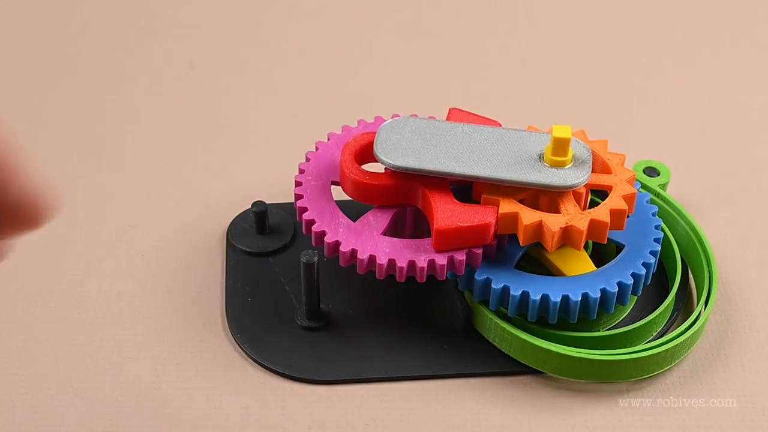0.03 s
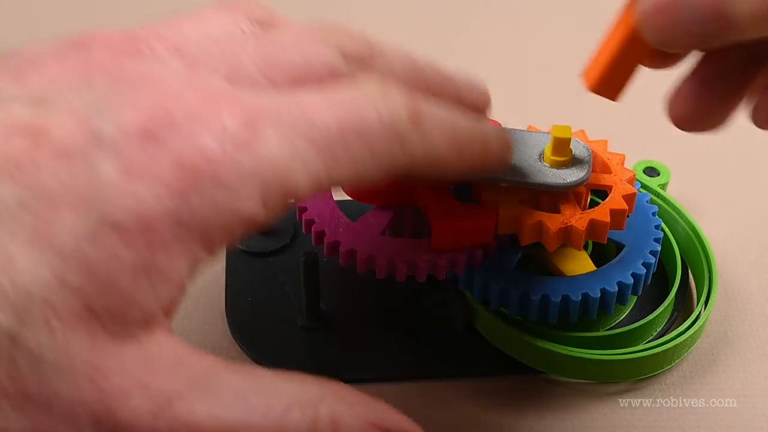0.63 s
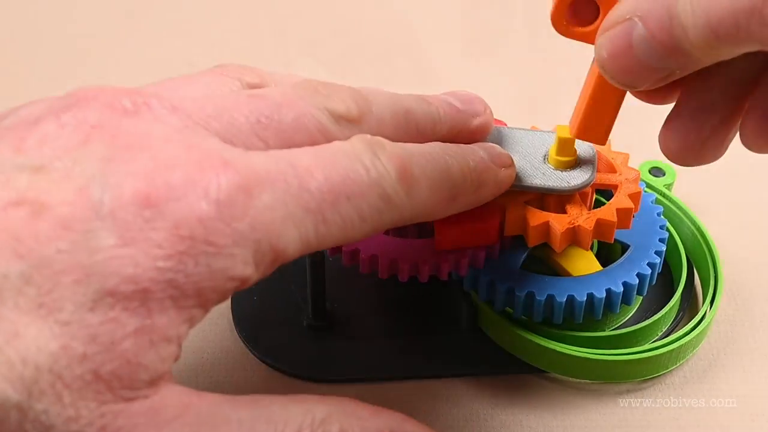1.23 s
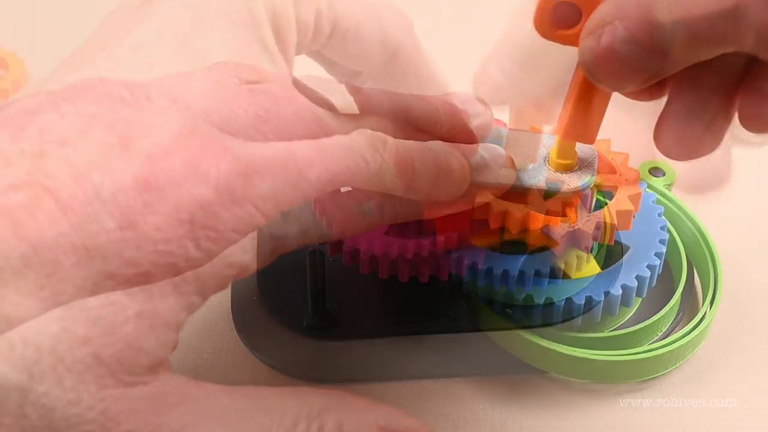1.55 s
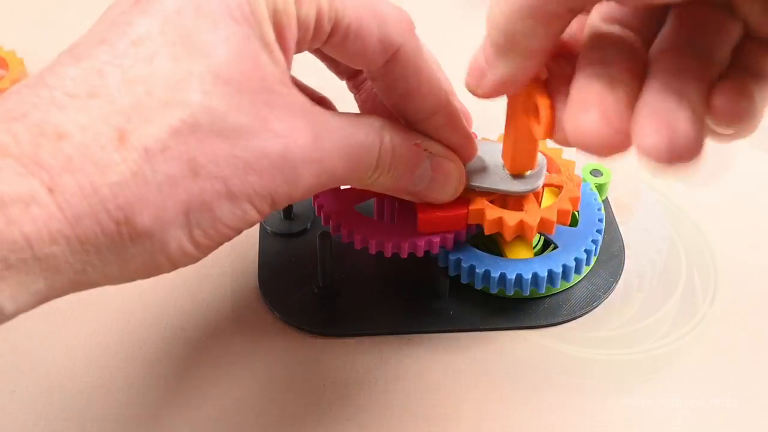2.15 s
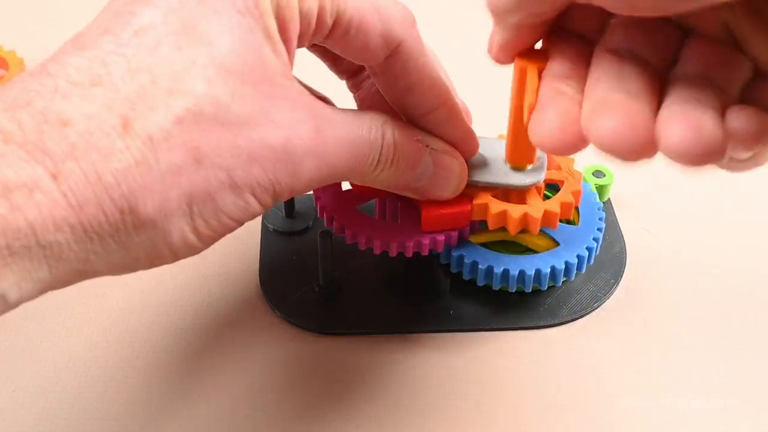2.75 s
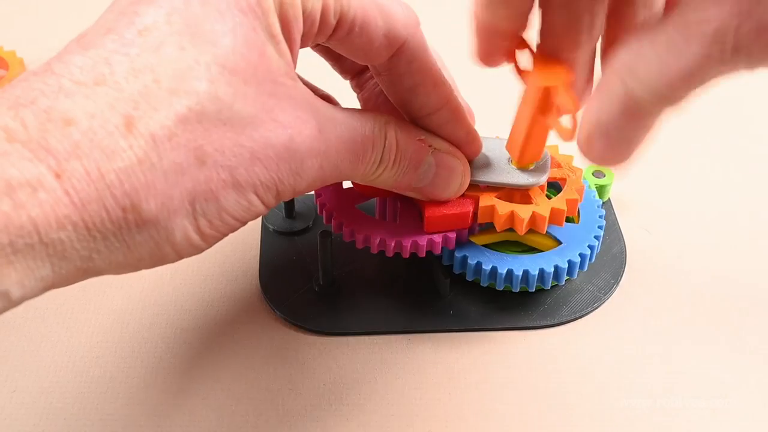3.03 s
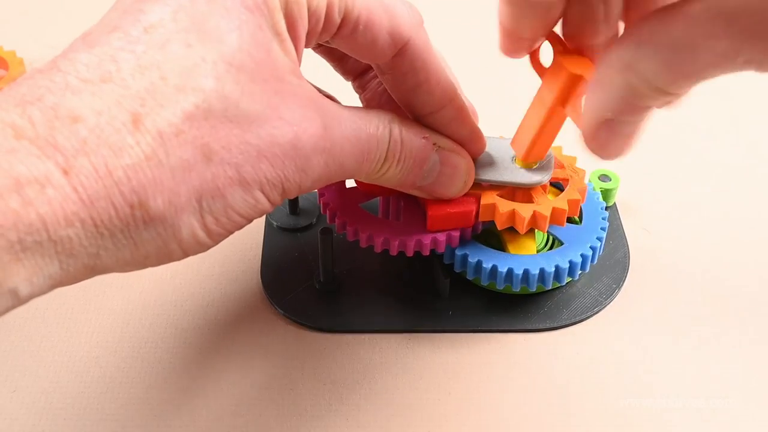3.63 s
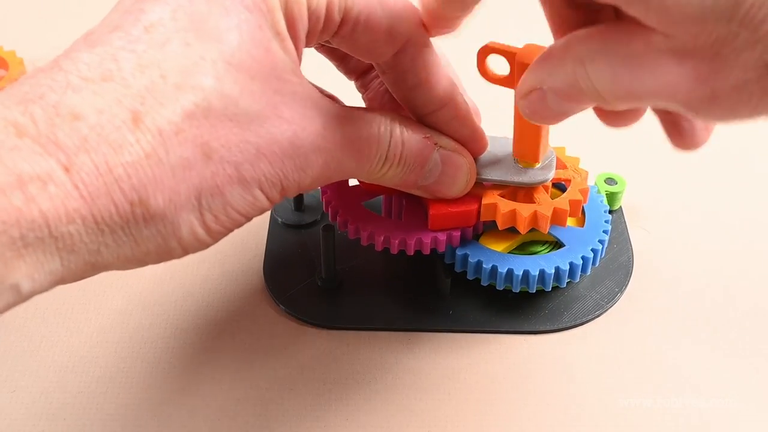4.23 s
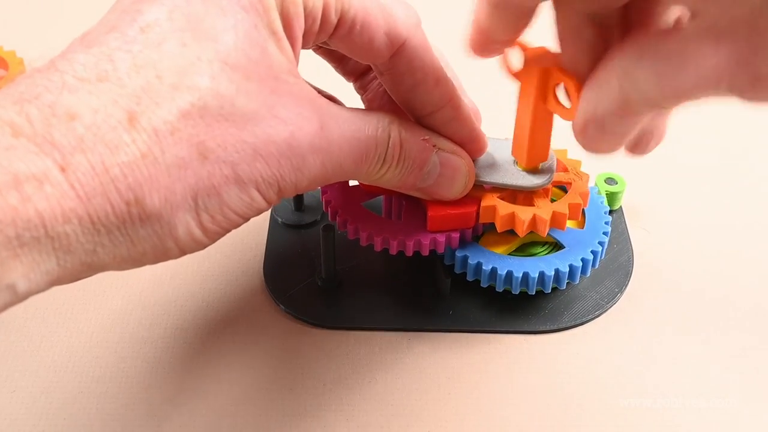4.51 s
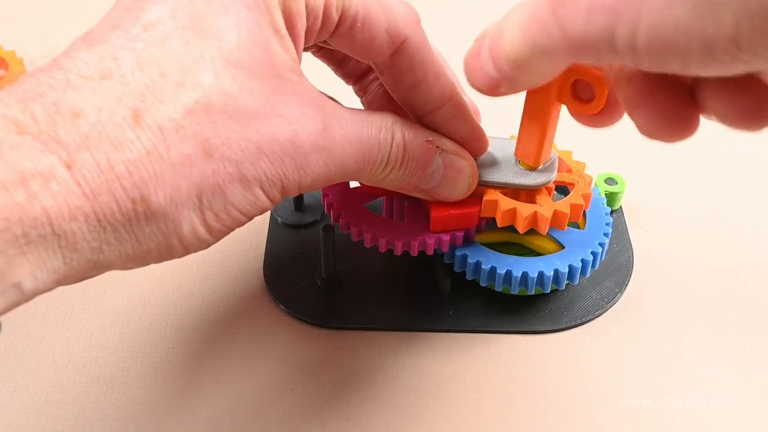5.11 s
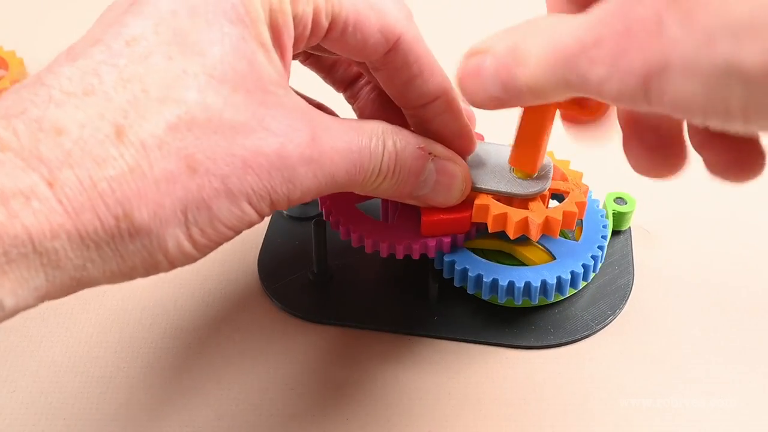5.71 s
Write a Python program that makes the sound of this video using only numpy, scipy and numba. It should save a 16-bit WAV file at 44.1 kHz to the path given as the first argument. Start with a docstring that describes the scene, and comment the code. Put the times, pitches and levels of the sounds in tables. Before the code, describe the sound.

A small plastic clockwork mechanism is handled on a table, close to a stereo microphone in a small room. It opens with a brief key squeak, then fingers rub and knock on the plastic, with soft table bumps and a high hiss that swells between 1.2 and 2.2 seconds. The key winds the spring in short twists at about 1.4, 2.0, 2.6, 3.2 and 3.7 seconds. In each, the gear creaks and breaks free, mostly with a sharp snap, and a springy catch rattles brightly over the teeth for under a fifth of a second. The level dips briefly after each snap and rattle. Light knocks, stray ticks and faint squeaks fall in between. A slower sixth twist snaps at 4.7 seconds and trails into separate ticks until 5.2. More knocks and rubbing follow, with a small squeak and puff of hiss near 5.9 seconds.

```python
"""A key squeaks and fingers rub and knock on a plastic clockwork model, held down on a table
close to a stereo microphone in a small room. The key winds it in six twists. In each, the gear creaks
and breaks free, mostly with a snap, and a pawl (a small springy catch) rattles over the teeth until
the wrist brakes. The last twist is slow and ends in lone ticks. High hiss comes and goes.
An automatic gain control turns the sound down briefly behind each snap and rattle."""
import sys
import numpy as np
from scipy import signal
from scipy.fft import rfft, irfft
from scipy.io import wavfile
from scipy.ndimage import uniform_filter1d
from numba import njit

SR = 44100
rng = np.random.default_rng(int(sys.argv[2]) if len(sys.argv) > 2 else 0)


def output_pcm(signal):
    """Save a mono or channel-first signal as 16-bit PCM at the path in sys.argv[1].

    Samples are clipped to [-1, 1] before scaling.
    """
    pcm = np.clip(np.atleast_2d(signal).T, -1, 1) * 32767
    wavfile.write(sys.argv[1], SR, np.round(pcm).astype(np.int16))


N = 263277


def undb(db):
    """Turn decibels into a volume factor."""
    return 10 ** (np.asarray(db) / 20)


def unit(x):
    """Scale x to an average (rms) level of 1."""
    return x / np.sqrt(np.mean(x ** 2) + 1e-20)


def strength(x, db, seconds):
    """Give a hit the energy of a steady level db that lasts this many seconds."""
    return x * undb(db) * np.sqrt(seconds * SR / np.mean(np.sum(x ** 2, axis=-1)))


def add(out, start_s, x):
    """Mix x into out at the given time."""
    i = max(int(start_s * SR), 0)
    out[:, i:i + x.shape[1]] += x[:, :max(N - i, 0)]


def along(table, hz, column=1):
    """Read a table's column at any pitch, gliding between its rows."""
    rows = np.array(table)
    return np.interp(np.log(hz + 1), np.log(rows[:, 0]), rows[:, column])


def band(x, low_hz, high_hz):
    """Keep what lies between two pitches."""
    edges_hz = [low_hz, min(high_hz, SR / 2 - 500)]
    return signal.sosfilt(signal.butter(3, edges_hz, "band", fs=SR, output="sos"), x)


def aligned_band(x, low_hz, high_hz):
    """Keep one band without delaying it, so that neighbouring bands join smoothly."""
    hz = np.fft.rfftfreq(x.shape[-1], 1 / SR) + 1
    return irfft(rfft(x) / (1 + (low_hz / hz) ** 10) / (1 + (hz / high_hz) ** 10))


def soften(x, hz):
    """A soft contact dulls what lies above hz."""
    return signal.sosfilt(signal.butter(2, min(hz, SR / 4), fs=SR, output="sos"), x)


def flatten(x, fade_s):
    """Make all pitches in a burst equally strong, then fade it quickly."""
    spectrum = rfft(x)
    return irfft(spectrum / (np.abs(spectrum) + 1e-9)) * np.exp(-np.arange(x.shape[-1]) / SR / fade_s)


def ring(x, tones, detune=1):
    """Let x shake an object's own tones (pitch_hz, width_hz, level_db); narrow ones ring longer."""
    f = np.fft.rfftfreq(x.shape[-1], 1 / SR) + 1e-6
    response = sum(undb(db) / (1 + 1j * (f - (hz * detune) ** 2 / f) / width) for hz, width, db in tones)
    return irfft(rfft(x) * response, x.shape[-1])


def stereo_noise(size, spread):
    """Hiss for left and right; spread sets how much the two differ."""
    mid, side = rng.standard_normal((2, size))
    return np.array([mid + spread * side, mid - spread * side])


def chatter(size, hold_s, fade_s, spread):
    """Plastic parts chatter while they touch, then settle."""
    t = np.arange(size) / SR
    fade = np.exp(-np.maximum(t - hold_s, 0) / fade_s)
    return stereo_noise(size, spread) * fade * (1 - np.exp(-t / .0001))


def blow(size, impact_db, fade_s, spread):
    """One clean impact, then chatter as the parts settle."""
    settling = strength(chatter(size, 0, fade_s, spread), 0, 1 / SR)
    return settling + undb(impact_db) * signal.unit_impulse(size)


def friction(per_s, scatter_db, spread):
    """Tiny random clicks of uneven size, as when surfaces stick and slip."""
    slips = rng.random(N) < per_s / SR
    return stereo_noise(N, spread) * slips * undb(scatter_db * np.minimum(rng.exponential(size=N), 4))


def swells(rows, rest_db=-120, rise_s=.004, fade_s=.009):
    """Volume over time: each row starts, changes by swell_db around its level_db, and fades."""
    power = np.full(N, undb(rest_db) ** 2)
    for start_s, length_s, level_db, swell_db in rows:
        i = max(int(start_s * SR), 0)
        t = np.arange(min(int((length_s + .2) * SR), N - i)) / SR
        gain = undb(level_db + swell_db * (np.minimum(t / length_s, 1) - .5))
        fade = np.exp(-np.maximum(t - length_s, 0) / fade_s)
        power[i:i + len(t)] += (gain * np.minimum(t / rise_s, 1) * fade) ** 2
    return np.sqrt(power)


# The turning key drags on its shaft: start_s, length_s, pitch_hz, width_hz, level_db
KEY_SQUEAKS = [(0, 0.022, 1564, 48.4, -33), (0.038, 0.022, 3800, 121, -44), (0.837, 0.21, 1930, 1200, -56),
               (2.888, 0.25, 1710, 700, -54.5), (4.371, 0.28, 1680, 810, -54),
               (4.502, 0.15, 11500, 200, -65), (5.884, 0.13, 1656, 106, -45)]
def squeaks():
    """Friction locks onto one tone of the key; the narrower the tone, the more it squeaks."""
    out = np.zeros((2, N))
    for start_s, length_s, hz, width_hz, db in KEY_SQUEAKS:
        size = int(length_s * SR)
        tone = ring(stereo_noise(size, spread=.054), [(hz, width_hz, 0)])
        drag = unit(band(tone, hz / 2, hz * 1.01))
        add(out, start_s, drag * signal.windows.tukey(size) * undb(db))
    return out


# The tones of the frame and wheels, lowest first: pitch_hz, width_hz, level_db
FRAME_TONES = [(260, 35, 6), (302, 37, -3), (382, 300, -3.5), (474, 84, -9), (559.5, 18, 0.5), (795, 48, 1),
               (835, 62, 0), (1039, 48, 2.5), (1153, 93, -2.5), (1340, 78, -18), (1644, 54, 0.5),
               (1843, 36, -10), (2030, 98, -14), (2383, 400, -7.5), (2680, 200, -9), (3270, 600, -3.5)]
# The tones of the table top: pitch_hz, width_hz, level_db
TABLE_TONES = [(137.6, 14.2, 18), (210, 69, 5.5)]
def thump(push, time_s, regrip_s=2):
    """Frame and table boom; the table booms less once the flat hand changes to a fingertip grip."""
    table_db = np.where(time_s < regrip_s, 0, -2.5)
    return ring(push, FRAME_TONES[:3]) + undb(table_db) * ring(push, TABLE_TONES)


# Fingers slide to a new grip: start_s, length_s, rub_db, push_db, swell_db
FINGER_SLIDES = [(0, 0.22, -55, -47, -5), (0.23, 0.25, -60.5, -59, -11), (0.583, 0.18, -55, -48, -8),
                 (0.746, 0.26, -51, -53.5, -2), (1.11, 0.33, -47, -50, 1), (1.67, 0.26, -49, -52.5, 2),
                 (2.264, 0.074, -52, -54, 4), (2.432, 0.97, -58.5, -62, 1), (2.862, 0.18, -58.5, -62, -9),
                 (3.009, 0.25, -52.5, -62, -15), (3.389, 0.088, -55.5, -62.5, -20),
                 (3.554, 0.18, -54.5, -55, -12), (4.01, 0.11, -47, -61, 0), (4.231, 0.39, -53, -49, -1.5),
                 (5.361, 0.043, -44.5, -44, -1), (5.68, 0.13, -58, -63.5, -19), (5.85, 0.2, -48, -50.5, 7)]
def rubbing():
    """Skin and wheels rub on the frame and push it against the table; fingers catch now and then."""
    rubs = [(start, length, db, swell) for start, length, db, _, swell in FINGER_SLIDES]
    pushes = [(start, length, db, swell) for start, length, _, db, swell in FINGER_SLIDES]
    finger_rub = swells(rubs, rest_db=-63.5)  # a resting hand is never quite still
    finger_push = swells(pushes, rest_db=-59)
    skin = friction(per_s=3000, scatter_db=1.5, spread=.21)
    rub = unit(band(ring(skin, FRAME_TONES[3:]) + undb(4) * skin, 380, 2800))
    slips = friction(per_s=30, scatter_db=1, spread=.3)
    jolt = chatter(size=1024, hold_s=0, fade_s=.0025, spread=.3)
    jolts = signal.fftconvolve(slips, jolt, axes=1)[:, :N]
    catches = undb(-7) * unit(band(ring(jolts, FRAME_TONES[3:]), 380, 2600))
    pressure = friction(per_s=3100, scatter_db=3, spread=.25)
    boom = unit(band(thump(pressure, np.arange(N) / SR), 112, 520))
    rub_volume = np.hypot(finger_rub, wheel_volume(db=-48))
    boom_volume = np.hypot(finger_push, wheel_volume(db=-52.5))
    return rub * rub_volume + catches * finger_rub + boom * boom_volume


# The bright tones of the hiss and of hard knocks on the frame: pitch_hz, width_hz, level_db
BRIGHT_TONES = [(3630, 4500, 8), (5700, 4200, 15.5), (8800, 2700, -22.5), (13300, 2500, -1.5)]
# Stretches of high hiss; the second is a sudden puff that fades quickly:
# start_s, length_s, level_db, swell_db
HISS_SWELLS = [(0, 0.19, -51, -3), (1.025, 0.12, -56.5, -31), (1.17, 1, -43, 12), (1.6, 0.58, -61.5, -5),
               (5.88, 0.078, -61.5, 39)]
def high_hiss(flicker_s=.007, flicker_db=3):
    """Dense tiny clicks blur into a bright hiss that flickers as it swells or fades."""
    hiss = unit(ring(friction(per_s=8800, scatter_db=-3.5, spread=1), BRIGHT_TONES))
    wobble = unit(uniform_filter1d(rng.standard_normal(N), int(flicker_s * SR)))
    flicker = unit(undb(flicker_db * wobble))
    return hiss * flicker * swells(HISS_SWELLS)


# The hand shifts its weight: start_s, length_s, level_db, swell_db
HAND_SHIFTS = [(0, 0.62, -64.5, -14), (1.25, 0.17, -47.5, 11), (1.67, 0.29, -41, 6), (2.33, 0.17, -57, 3)]
def rumble():
    """The hand's weight makes the table rumble, more quietly on the left."""
    low_noise = unit(band(stereo_noise(N, spread=.9), 28, 90)) * undb([[-7], [0]])
    return low_noise * swells(HAND_SHIFTS, rest_db=-80)


# The tone colour of the room's air: pitch_hz, relative_db
AIR_COLOUR = [(25, -12), (90, -12), (134, -8.5), (190, -27.5), (800, -9), (2500, -24.5), (6000, -20),
              (16000, -28)]
def air(level_db=-58.5):
    """The faint steady noise of the room."""
    colour = undb(along(AIR_COLOUR, np.fft.rfftfreq(N, 1 / SR)))
    return unit(irfft(rfft(stereo_noise(N, spread=.57)) * colour, N)) * undb(level_db)


# Key and fingers hit the frame: start_s, low_db, mid_db, high_db, pitch_hz, dull_above_hz
FRAME_KNOCKS = [(.0042, -48, -42, -42, 1700, 2460), (0.0912, -40, -36.5, -44.5, 1100, 2160),
                (0.2428, -44.5, -44.5, -51, 880, 1460), (0.2792, -51, -48.5, -64, 1150, 1100),
                (0.3384, -48.5, -49.5, -67, 1210, 1100), (0.4456, -74, -54.5, -76, 940, 3000),
                (.563, -54, -49.5, -57.5, 2100, 3020), (.596, -42, -39, -38.5, 1690, 2890),
                (0.7238, -40, -40, -52.5, 1180, 1580), (.758, -45.5, -37.5, -52.5, 680, 2410),
                (.769, -57, -51, -60, 1640, 3200), (0.991, -55, -53.5, -62, 1600, 3000),
                (1.1291, -48, -68, -52, 1600, 2800), (1.1659, -76.5, -43.5, -36.5, 2350, 3300),
                (1.2654, -50, -43.5, -49, 2370, 3000), (1.3132, -68.5, -50, -50, 2300, 3000),
                (1.3357, -67.5, -45.5, -48, 2270, 3000), (1.4001, -54, -44, -51, 2380, 3220),
                (1.6917, -73.5, -37.5, -39, 2270, 3180), (1.8271, -62.5, -43, -52, 1240, 2800),
                (1.8494, -51, -36, -50, 1340, 3380), (1.962, -46.5, -43, -47, 1040, 1400),
                (2.287, -80, -40.5, -47, 3030, 3260), (2.4277, -64, -52, -55, 1630, 3000),
                (2.444, -50.5, -43, -44, 1300, 2410), (2.559, -47, -45.5, -47, 2580, 3200),
                (2.893, -55, -49, -51.5, 1630, 2620), (3.0317, -58, -38.5, -45.5, 1050, 2820),
                (3.0607, -67, -42.5, -59, 1030, 2000), (3.073, -68.5, -62, -39, 1220, 3000),
                (3.1091, -48, -44, -58.5, 1630, 2200), (3.1418, -55, -44.5, -45, 1220, 2600),
                (3.5837, -48, -44, -39.5, 2650, 3950), (3.6144, -49, -46, -56, 1080, 1980),
                (3.6631, -48, -45, -34, 2550, 2980), (3.682, -51, -48.5, -60, 554, 1810),
                (3.7148, -48, -49, -30, 2710, 3500), (4.0762, -46, -47, -45.5, 1150, 2970),
                (4.3533, -67, -45, -43, 1500, 2380), (4.386, -75, -45, -31, 1650, 3140),
                (5.3663, -48.5, -44, -52, 570, 1500), (5.3853, -46.5, -44, -60, 1030, 1290),
                (5.554, -45, -31, -40, 1970, 3830), (5.6828, -74, -50, -46, 2370, 3000),
                (5.806, -53, -58, -47, 2300, 3000), (5.8242, -47.5, -43.5, -31.5, 2310, 2980),
                (5.8348, -55, -36.5, -66, 560, 2570)]
def knocks(scatter_db=4):
    """A blow thumps the table, rings the frame and struck part, and cracks; fingers sound duller."""
    out = np.zeros((2, N))
    for start_s, low_db, mid_db, high_db, pitch_hz, dull_above_hz in FRAME_KNOCKS:
        push = blow(size=8192, impact_db=2, fade_s=.0033, spread=.35)
        thud = band(thump(push, start_s), 90, 520)
        # Each blow lands elsewhere and favours other tones; finger pressure shifts their pitch.
        tones = [(hz, width, db + scatter_db * rng.standard_normal())
                 for hz, width, db in FRAME_TONES[3:]]
        frame = ring(push, tones, detune=1 + .018 * rng.standard_normal())
        struck_part = ring(push, [(pitch_hz, .17 * pitch_hz, -1)])
        clack = soften(frame + struck_part + undb(-9) * push, dull_above_hz)
        clack = band(clack, 200 + .27 * pitch_hz, 3400)
        tap = flatten(blow(size=8192, impact_db=-4, fade_s=.0032, spread=.58), fade_s=.012)
        crack = band(ring(tap, BRIGHT_TONES), 3000, 17000)
        for layer, db in (thud, low_db), (clack, mid_db), (crack, high_db):
            add(out, start_s, strength(layer, db, seconds=.02))
    return out


# The heel of the hand bumps the table: start_s, pitch_hz, level_db
HAND_BUMPS = [(0.256, 142, -44), (0.734, 134.6, -38.5), (1.123, 214, -42.5), (1.871, 116, -41.5),
              (2.438, 137.5, -56)]
def bumps(rise_s=.0087, fade_s=.017):
    """A soft push sets the table swinging a few times."""
    out = np.zeros((2, N))
    t = np.arange(SR // 4) / SR
    for start_s, hz, db in HAND_BUMPS:
        swing = np.sin(2 * np.pi * hz * t) * (1 - np.exp(-t / rise_s)) * np.exp(-t / fade_s)
        add(out, start_s, strength(np.tile(swing, (2, 1)), db, seconds=.04))
    return out


# The wound spring strains the gear before it breaks free: start_s, length_s, level_db, swell_db
GEAR_CREAKS = [(1.395, 0.055, -44.5, 4), (1.965, 0.03, -41, -3), (2.56, 0.03, -43.5, -17),
               (3.023, 0.063, -39.5, -11), (3.138, 0.022, -37, 12), (3.61, 0.077, -46, -2),
               (3.68, 0.024, -40, 11), (4.62, 0.036, -52.5, -5)]
def creaks():
    """Loaded teeth slip in coarse little steps that shake the whole frame."""
    slips = friction(per_s=700, scatter_db=1.5, spread=.14)
    grit = ring(slips, FRAME_TONES) + undb(-4.5) * slips
    return unit(soften(band(grit, 130, 3300), hz=1293)) * swells(GEAR_CREAKS)


# Twists of the key: start_s, length_s, tooth_count, speed_up_ratio, last_gap_extra_ratio,
# braking_teeth, tick_db
KEY_TWISTS = [(1.4349, .1614, 15, 1.91, 3.26, 1.26, -18.5), (2.0014, .1487, 15, 1.74, .55, 1.15, -18.5),
              (2.5957, .1844, 18, .84, 2.49, .83, -18.7), (3.1609, .165, 16, 1.97, 2.82, 1.45, -18.7),
              (3.7181, .1846, 15, 2.35, 2.84, .96, -17.3), (4.6718, .1869, 8, 1.43, .67, .7, -21.8)]
def wheel_volume(db, normal_teeth_per_s=100):
    """The wheels rub during each twist, louder when faster; db is their level at normal speed."""
    return swells([(start_s, length_s, db + 10 * np.log10(count / length_s / normal_teeth_per_s), 0)
                   for start_s, length_s, count, *_ in KEY_TWISTS])


# The thud, body, edge and top of a snap: low_hz, high_hz
SNAP_RANGES = [(50, 3000), (3600, 7000), (7200, 11000), (11200, 16500)]
# The gear breaks free, or a tooth lands hard: start_s, thud_db, body_db, edge_db, top_db
GEAR_SNAPS = [(1.4401, -29, -16, -16, -6), (1.9996, -27, -16.5, -18, -12.5),
              (2.595, -35, -20.5, -15, -17.5), (3.1641, -25, -26, -18.5, -14), (3.7208, -28, -25, -21, -18),
              (4.6697, -22.5, -10.5, -36, -5), (5.147, -43, -51, -14.5, -20)]
def snaps(lead_samples=128):
    """The spring's load lets go in one very short, hard crack."""
    out = np.zeros((2, N))
    for start_s, *levels_db in GEAR_SNAPS:
        burst = chatter(size=1024, hold_s=.0007, fade_s=.00015, spread=.7)
        crack = flatten(flatten(burst, fade_s=.002), fade_s=.002)
        crack = np.roll(crack, lead_samples, axis=1)
        thud = np.tile(crack[0], (2, 1))  # long waves reach left and right alike
        for source, range_hz, db in zip((thud, crack, crack, crack), SNAP_RANGES, levels_db):
            layer = strength(aligned_band(source, *range_hz), db, seconds=.001)
            add(out, start_s - lead_samples / SR, layer)
    return out


# One tooth slips past while the key creeps or is let go: start_s, level_db
LONE_TICKS = [(1.6922, -24.5), (2.170, -43), (2.2859, -18.5), (2.543, -44), (2.994, -43), (3.396, -27),
              (3.6655, -25.5), (3.9824, -31.5), (4.0385, -38.5), (4.069, -40), (4.099, -47), (4.4585, -39),
              (4.9017, -20.5), (4.9374, -17), (4.9689, -16), (5.0147, -19), (5.0703, -18.5),
              (5.1457, -19.5), (5.2065, -21.5)]
def teeth(scatter_db=2.1, fade_db=2):
    """Time and level of every tick; a twist gathers speed, then brakes over its last teeth."""
    ticks = list(LONE_TICKS)
    for start_s, length_s, count, speed_up, last_gap_extra, braking_teeth, db in KEY_TWISTS:
        tooth = np.arange(round(count))
        progress = tooth / tooth[-1]
        braking = 1 + last_gap_extra * np.exp((tooth - tooth[-1]) / braking_teeth)
        gaps = speed_up ** -progress * braking
        levels_db = db - fade_db * (progress - .5) + scatter_db * rng.standard_normal(len(tooth))
        ticks += zip(start_s + length_s * np.cumsum(gaps) / gaps.sum(), levels_db)
    return ticks


# The tones of the pawl and gear teeth, lowest first: pitch_hz, width_hz, level_db
PAWL_TONES = [(2930, 120, 4), (4040, 1800, -5.5), (5130, 800, 1.5), (6120, 900, 1.5), (7340, 950, -9),
              (9000, 1300, 3), (11480, 860, -2.5), (12250, 800, 5.5), (13800, 890, 4), (15600, 700, -16)]
def ratchet(rise_s=.0007):
    """The pawl slides off a tooth and chatters on the next, ringing a little differently each time."""
    out = np.zeros((2, N))
    rise = np.minimum(np.arange(1024) / SR / rise_s, 1)
    for start_s, db in teeth():
        push = chatter(size=1024, hold_s=.0019, fade_s=.001, spread=.55) * rise
        detune = 1 + .042 * rng.standard_normal()
        body = ring(push, PAWL_TONES[:1]) + ring(push, PAWL_TONES[1:4], detune)
        click = undb(-16) * band(push, 7000, 17500)
        edge = ring(push, PAWL_TONES[4:], detune) + click
        add(out, start_s, strength(body, db - 8, seconds=.0022) + strength(edge, db, seconds=.0015))
    # Only a little of each tick reaches the large, low-sounding parts.
    return band(out, 2830, 15600) + undb(-12) * ring(out, FRAME_TONES + TABLE_TONES)


# The room's echo: pitch_hz, decay_s (time to fall 60 dB), relative_db, stereo_spread_ratio
ROOM_ECHO = [(151.4, 0.54, -2.5, 0.098), (520, 0.26, -0.5, 0.068), (1360, 0.16, 5.5, 0.1),
             (3340, 0.16, 5, 1), (8000, 0.21, -1, 0.88), (14600, 0.17, 1, 1)]
def room(x):
    """Table and walls return a smooth echo; its long waves are nearly alike left and right."""
    t = np.arange(SR // 2) / SR
    edges_hz = np.geomspace(80, 20000, 12)
    tail = 0
    for low_hz, high_hz in zip(edges_hz, edges_hz[1:]):
        decay_s, db, spread = (along(ROOM_ECHO, np.sqrt(low_hz * high_hz), k) for k in (1, 2, 3))
        noise = band(unit(stereo_noise(len(t), spread)), low_hz, high_hz)
        tail = tail + noise * undb(db - 60 * t / decay_s)
    tail = tail * np.clip(t / .002, 0, 1)
    return signal.fftconvolve(x, strength(tail, 0, 1 / SR), axes=1)[:, :N]


def from_right(x, left_lag_s=.000018):
    """Pawl and key stand a little to the right, so their sound reaches the left side later."""
    delay = np.exp(-2j * np.pi * np.fft.rfftfreq(N, 1 / SR) * left_lag_s)
    return np.array([irfft(rfft(x[0]) * delay, N), x[1]])


def scene():
    """Mix all sounds, each with its own volume and share of the room's echo."""
    ticks = ratchet() * undb(2)
    snap = snaps() * undb(2)
    knock = knocks() * undb(1)
    quiet = rubbing() + high_hiss() + rumble() + squeaks() + creaks() + bumps()
    echo = room(undb(-2.5) * ticks + undb(-13.5) * snap + undb(-.5) * knock + undb(-10) * quiet)
    return from_right(ticks + knock + quiet) + snap + echo + air()


@njit
def follow(x, rise_s, fall_s):
    """Trail behind x, at one speed going up and another going down."""
    trail, level = np.empty(len(x)), 0.
    for i in range(len(x)):
        level += (x[i] - level) / (SR * (rise_s if x[i] > level else fall_s))
        trail[i] = level
    return trail


def record(dry, threshold_db=-25, max_dip_db=7, top_hz=16100):
    """Gain control dips behind loud treble, too late for snaps, which clip; the very top is cut."""
    treble_power = np.mean(band(dry, 3000, 17000) ** 2, axis=0)
    smoothed = signal.lfilter(np.ones(22) / 22, 1, treble_power)
    excess_db = np.clip(10 * np.log10(smoothed + 1e-12) - threshold_db, 0, max_dip_db)
    gain = undb(-follow(excess_db, rise_s=.0014, fall_s=.095))
    clipped = np.clip(dry * gain, -1, 1)
    return signal.sosfilt(signal.ellip(10, .2, 70, top_hz, fs=SR, output="sos"), clipped)


dry = scene()
out = record(dry)
output_pcm(out)
```